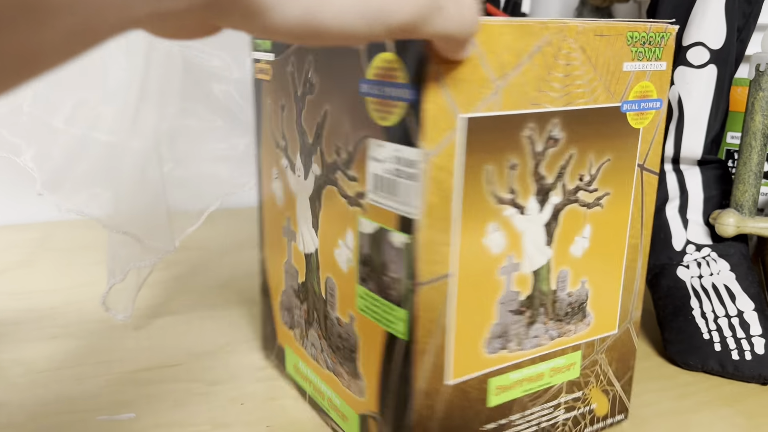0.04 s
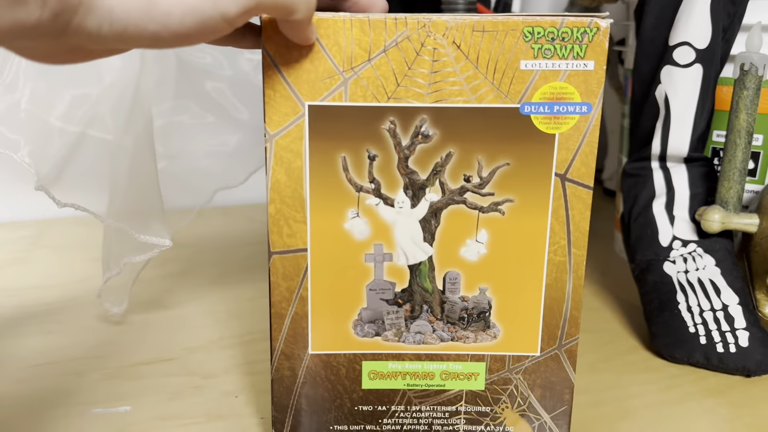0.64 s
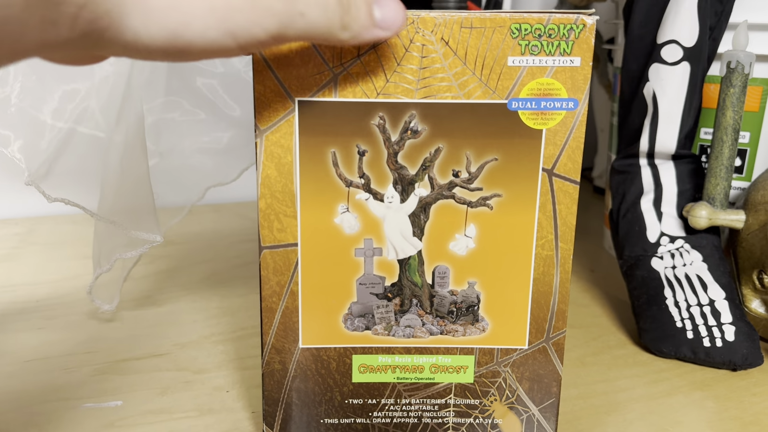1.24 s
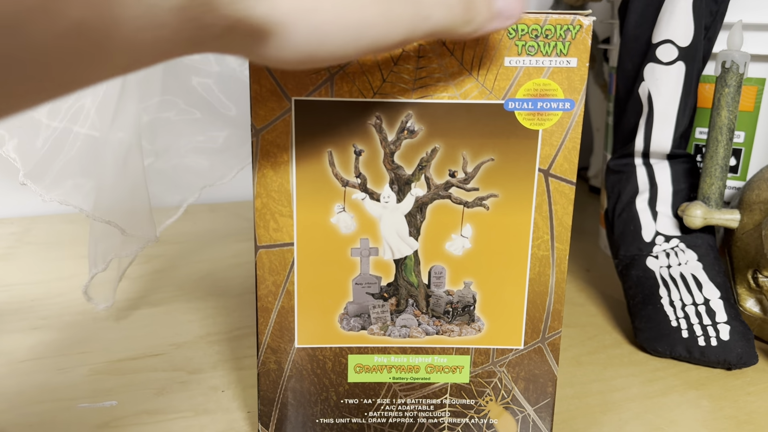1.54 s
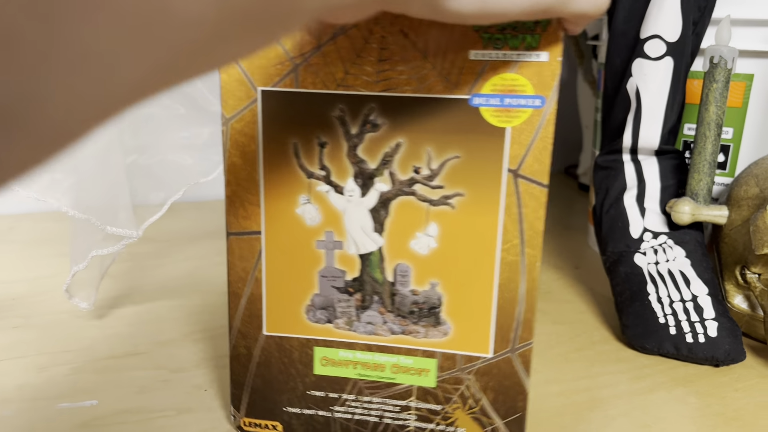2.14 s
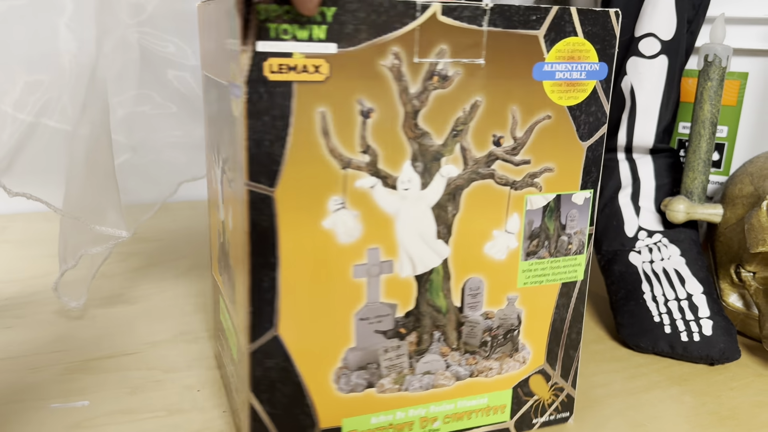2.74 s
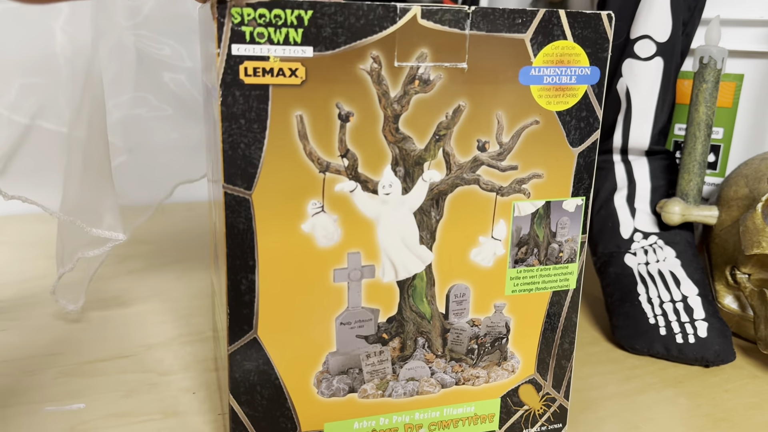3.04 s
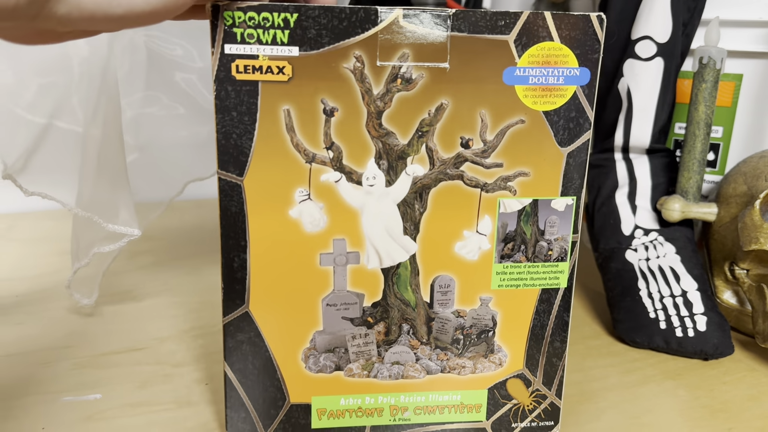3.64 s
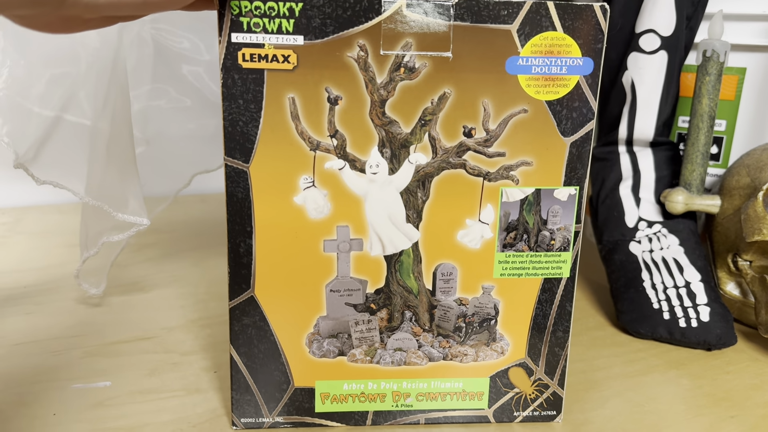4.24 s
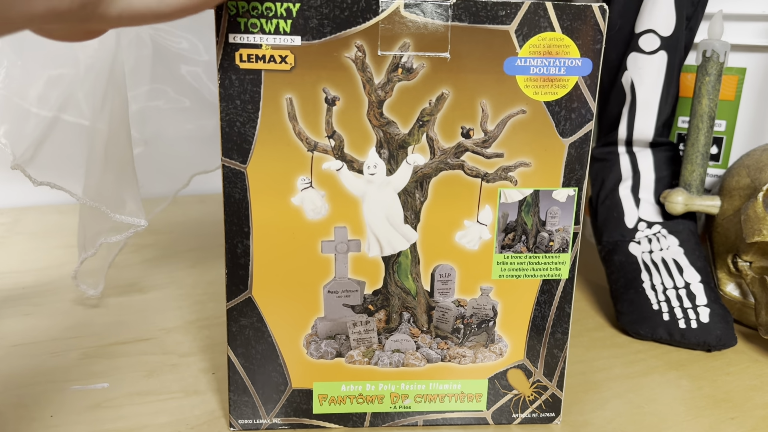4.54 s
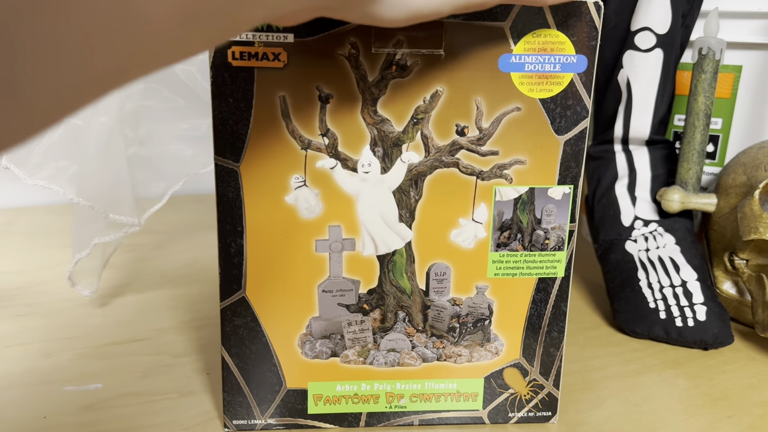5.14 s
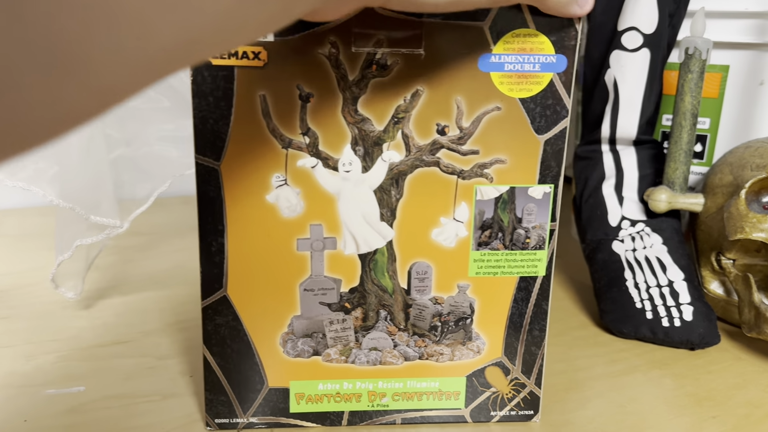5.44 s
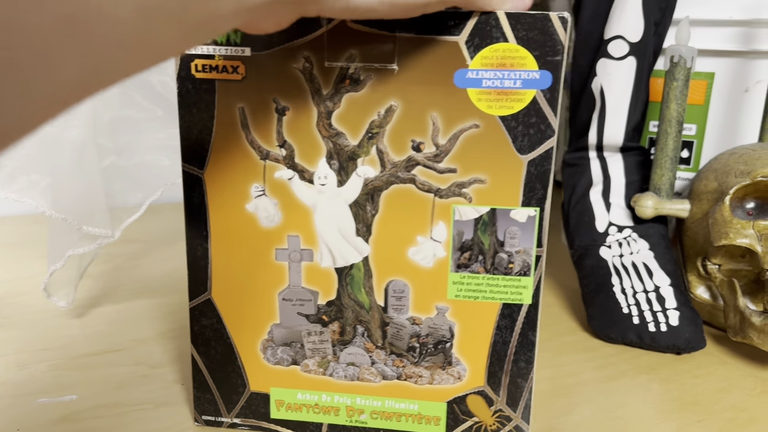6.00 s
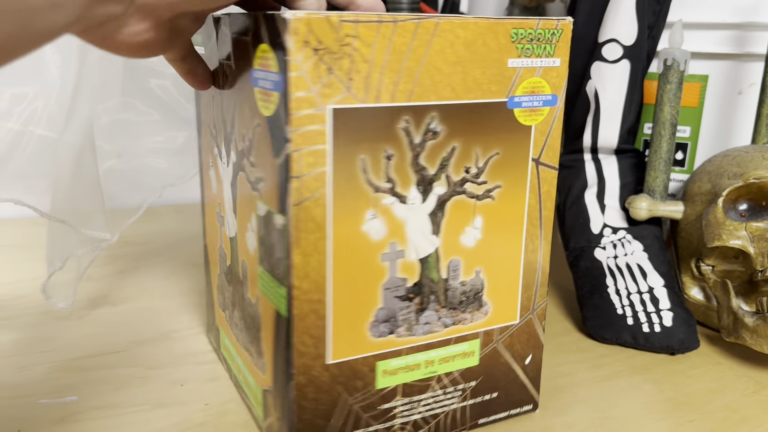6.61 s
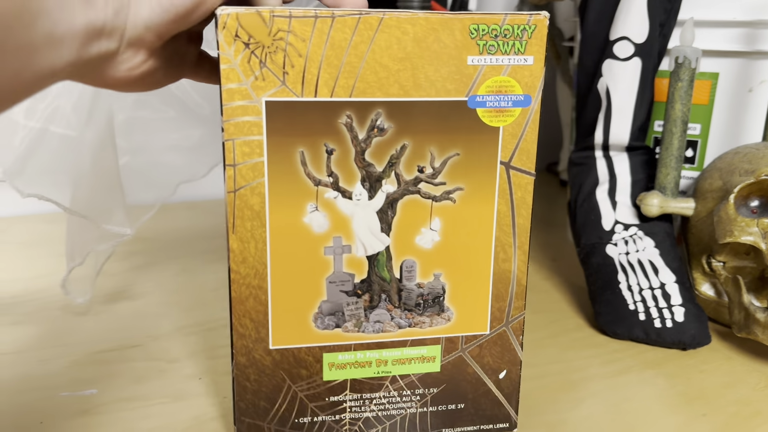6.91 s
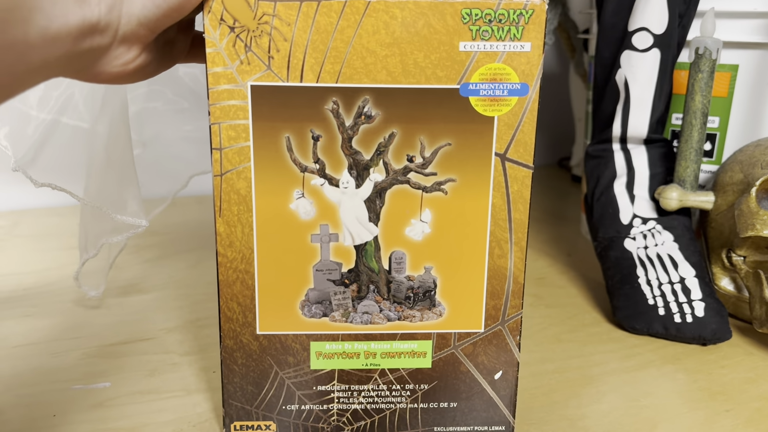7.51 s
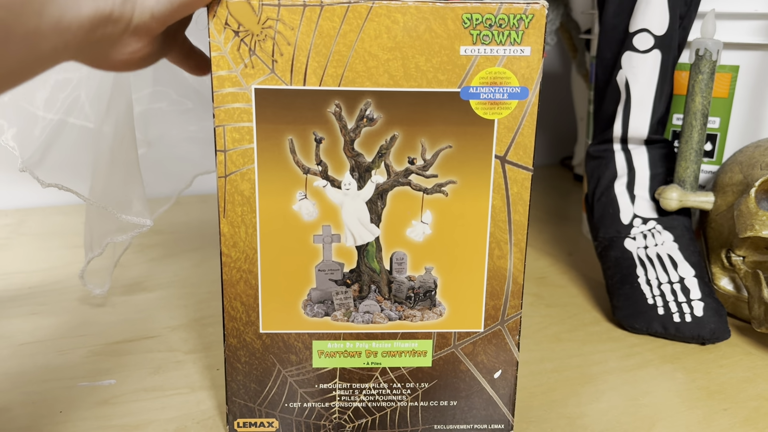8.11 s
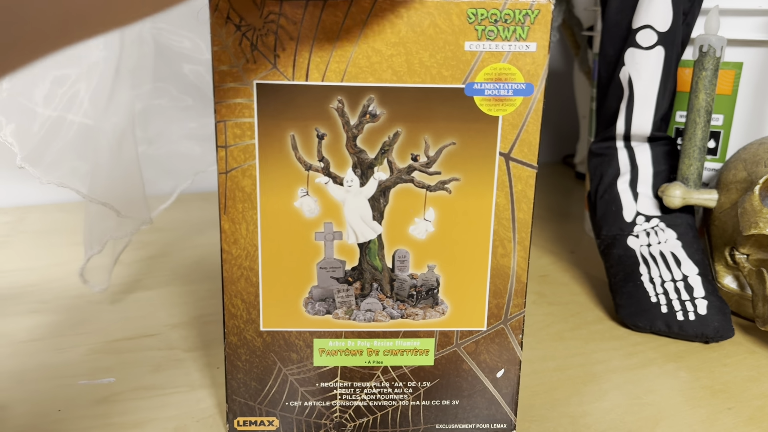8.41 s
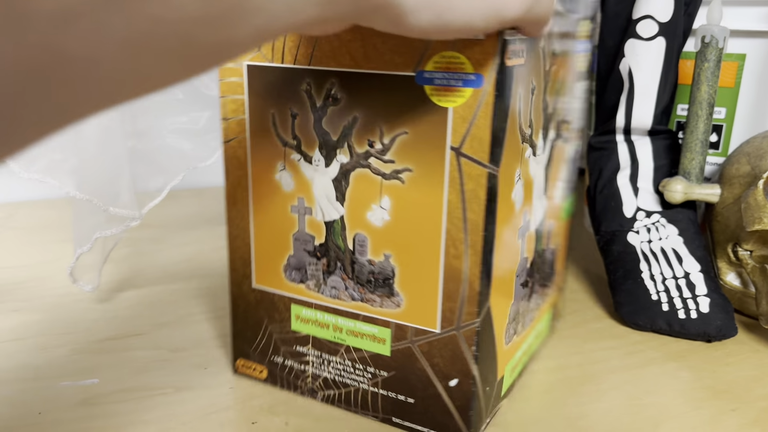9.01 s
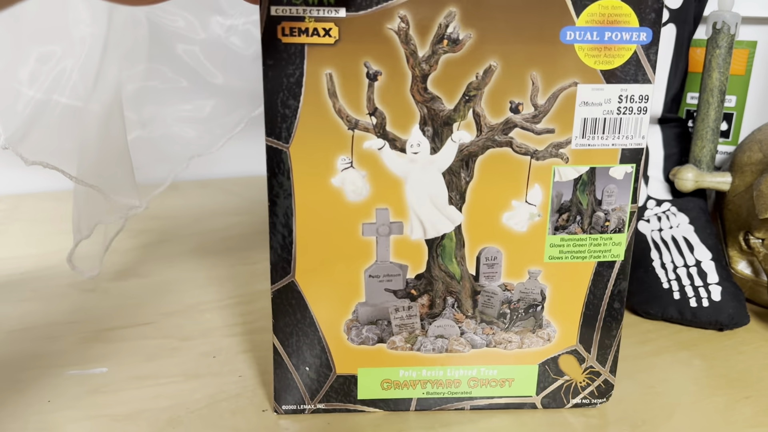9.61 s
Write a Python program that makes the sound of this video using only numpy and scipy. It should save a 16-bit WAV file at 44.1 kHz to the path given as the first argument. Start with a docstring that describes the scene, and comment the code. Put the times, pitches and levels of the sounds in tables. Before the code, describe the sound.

A cardboard box is turned by hand on a wooden table, heard close up. It opens with a dry, hollow scrape that fades by 0.6 seconds. Light finger knocks and ticks follow around 1.5 seconds. A second rasping slide runs from 2 to 2.9 seconds, with a softer, short one near 3.3. From about 3.5 to 5.8 seconds fingers rub, tap and grip the card again, and the box rocks with small low thuds. A firmer knock lands at 5.9 seconds and leads into another hissing scrape until about 7, with a sharp snap of the edge at 6.4, the loudest click. Brief rubs and light taps come around 7.2 and from 8 to 8.7 seconds. A last scrape lasts from 8.8 to 9.5, ending in a few ticks. Soft room air and a faint low hum continue underneath.

```python
"""Hollow, rasping scrapes of a cardboard box turned by hand on a wooden table, close up in a quiet room.
The bottom edge slides in countless tiny slips that rasp, hiss and make the panels drone.
Between turns the fingers rub, knock and re-grip, edges tick, and the box rocks on the table.
Soft room air and a low hum lie underneath."""
import sys
import numpy as np
from scipy import signal
from scipy.fft import rfft, irfft, next_fast_len
from scipy.io import wavfile

SR = 44100
rng = np.random.default_rng(int(sys.argv[2]) if len(sys.argv) > 2 else 0)


def waveform_to_disk(signal):
    """Save audio, clipped to [-1, 1], as 16-bit WAV at the path in sys.argv[1]."""
    frames = np.transpose(np.atleast_2d(signal))
    scaled = np.clip(frames, -1, 1) * 32767
    samples = np.round(scaled).astype(np.int16)
    wavfile.write(sys.argv[1], SR, samples)


N = 429975
TIME_S = np.arange(N) / SR

# Speed of each slide, as a curve of relative rasp level: time_s, speed_db, hiss_over_rasp_db
SLIDE_CURVES = [
    [(0.0, -51.5, -1), (0.074, -46.5, -2.5), (0.23, -55.5, -0.5), (0.24, -50, -2.5), (0.324, -60, 1),
     (0.356, -55.5, -4), (0.5, -68, -1.5), (0.566, -56.5, -5.5), (0.66, -100, -7)],
    [(2.0, -86, -11), (2.074, -50.5, -3.5), (2.256, -48, -3.5), (2.266, -48.5, 0), (2.52, -50.5, 1.5),
     (2.562, -57.5, 2), (2.732, -52, -1), (2.808, -55, -4), (2.89, -80.5, -7)],
    [(3.12, -84, -10), (3.138, -95, 4), (3.16, -67, -6.5), (3.292, -55, -0.5), (3.3, -53, -4),
     (3.37, -57.5, -0.5), (3.4, -60, -6), (3.452, -81.5, -17), (3.48, -86, 1)],
    [(5.97, -69, -6), (6.168, -45.5, 0.5), (6.26, -50.5, -4), (6.39, -49, -0.5), (6.4, -48, -1),
     (6.596, -53, -0.5), (6.89, -54.5, -3.5), (7.08, -64.5, -4.5), (7.16, -100, -16)],
    [(8.8, -79.5, -9), (8.84, -67.5, 0), (8.846, -57.5, -0.5), (8.912, -45.5, -2.5), (8.964, -46, -1),
     (9.484, -48.5, -6.5), (9.53, -62.5, -2), (9.56, -69, -11)],
]
# Grip on the two panels, per slide: lower_hz, upper_hz, mid_upper_db, end_upper_db, drone_weight_db
SLIDE_GRIPS = [(350, 508, -5.5, -8, 2), (348, 500, 2, -9, 1.5), (309, 490, -12.5, -7, 4.5),
               (298, 530, 5.5, 1.5, 1.5), (334, 520, 4, -1, 1)]
# Short rubs of fingers and box, relative levels: start_s, length_s, rasp_db, drone_db, hiss_db
FINGER_RUBS = [(1.591, 0.16, -75, -71.5, -84), (1.756, 0.086, -63.5, -56, -75),
               (2.884, 0.035, -63, -61.5, -72), (3.015, 0.038, -70, -64.5, -80),
               (3.481, 0.16, -65.5, -52.5, -75.5), (3.946, 0.1, -72.5, -56.5, -84),
               (4.05, 0.14, -82, -65.5, -94), (4.174, 0.12, -74.5, -59.5, -93),
               (4.916, 0.08, -76.5, -70, -82), (4.97, 0.079, -74, -64, -72), (5.195, .065, -60, -51.5, -64),
               (5.276, 0.027, -46.5, -41, -50), (5.323, 0.033, -65, -53, -76),
               (5.386, 0.062, -62, -54.5, -72), (5.455, 0.092, -68.5, -62, -80),
               (5.539, 0.058, -59, -52, -61.5), (5.615, 0.11, -48.5, -46.5, -48.5),
               (5.708, 0.12, -61, -55, -61), (5.802, 0.072, -53.5, -50.5, -57.5),
               (6.996, 0.17, -70.5, -53, -83), (7.177, 0.069, -54, -47.5, -57.5),
               (7.231, 0.07, -63.5, -49.5, -68), (8.061, 0.06, -66.5, -61, -72),
               (8.132, 0.051, -65.5, -61, -75), (8.246, 0.059, -73, -59, -84),
               (8.327, 0.055, -73, -62, -80), (8.636, 0.055, -65, -57, -82), (9.528, 0.076, -58, -49, -65)]
# Finger knocks: start_s, thud_db, thud_hz, slap_db, sway_db
FINGER_KNOCKS = [(0.265, -50, 160, -60, -42), (1.232, -61, 139, -55, -47.5), (1.354, -39.5, 244, -48, -47),
                 (1.514, -39.5, 150, -41.5, -37.5), (1.626, -60.5, 140, -69, -39),
                 (1.852, -50, 160, -65, -41.5), (4.438, -42.5, 226, -46, -49),
                 (4.73, -37.5, 280, -45.5, -41), (4.993, -47, 318, -44.5, -44), (5.076, -48, 243, -42, -58),
                 (5.277, -42.5, 193, -60, -47), (5.611, -51, 180, -67, -36.5),
                 (5.898, -24.5, 203, -36, -30), (5.925, -33.5, 200, -31.5, -59),
                 (6.805, -35, 173, -43, -45), (8.1, -46, 242, -41.5, -48), (8.263, -43, 220, -53.5, -54),
                 (8.4, -45.5, 188, -49, -46), (8.662, -52, 285, -46, -39), (8.773, -71, 143, -60, -47.5),
                 (9.738, -54, 318, -53.5, -56)]
# Ticks of nails and card edges: start_s, level_db, snap_s
EDGE_TICKS = [(0.5043, -42.5, .0004), (0.6938, -66, .0012), (1.5096, -48, .0007), (1.7964, -41, 0.00054),
              (3.144, -48.5, .0004), (3.835, -61, 0.0004), (4.0937, -55, 0.00028), (4.436, -47.5, 0.00057),
              (4.636, -63, .0005), (5.0755, -33.5, 0.0034), (5.646, -37, 0.00088), (5.6708, -28, 0.0039),
              (5.8696, -40, .0005), (5.899, -36.5, 0.00052), (5.933, -38, .0008), (6.3974, -33, 0.0012),
              (6.4095, -19, 0.00062), (6.4126, -23, 0.0011), (6.77, -31, 0.00037), (6.8842, -33, 0.0005),
              (7.1825, -42.5, 0.0007), (7.216, -38, .0006), (7.3438, -48.5, .0006), (8.173, -49, .001),
              (8.3871, -35.5, 0.00068), (8.651, -60, .002), (8.743, -60, .0004), (8.8486, -31, 0.00038),
              (9.577, -41, 0.00068), (9.5978, -34, 0.0013), (9.734, -49.5, 0.00055)]
# Box modes: pitch_hz, level_db, t60_s
BOX_MODES = [(180, -13, 0.11), (301.5, 1, 0.11), (385, -32, .07), (506, 2.5, 0.07), (736, -10.5, 0.089),
             (856, -7.5, 0.034)]

# Source spectra: freq_hz, gain_db
DRONE_SPECTRUM = [(30, -49), (70, -6), (125, -6), (190, 1), (280, 1), (360, -13), (430, 0), (560, -12.5),
                  (640, -18), (900, -23), (2000, -93.5)]
RASP_SPECTRUM = [(300, -38.5), (620, -1), (730, 3), (1100, 1), (1600, -3.5), (2200, -1.5), (2900, -5.5),
                 (3800, -6.5), (5500, -15), (12000, -63.5)]
HISS_SPECTRUM = [(1500, -35.5), (3200, 3.5), (4300, -0.5), (5600, 2), (7000, 4.5), (8200, 5.5), (9500, 2),
                 (10700, -3), (12500, 4), (15500, 1.5)]
FIZZ_SPECTRUM = [(8500, -31), (10500, -10), (12500, 2), (15500, -5)]
SLAP_SPECTRUM = [(80, 4.5), (300, 2), (600, -6), (1200, -10), (2200, -17.5), (4500, -27), (12000, -55)]
TICK_SPECTRUM = [(100, -39), (300, 12), (900, -13.5), (2300, 2.5), (4500, -3), (7300, 1), (10500, -7),
                 (13000, -3.5), (16000, -3)]
AIR_SPECTRUM = [(20, -16.5), (45, -1.5), (90, -3), (115, -7), (170, -13), (300, -17.5), (600, -27.5),
                (1000, -32), (2000, -37), (4000, -42.5), (8000, -42), (10500, -48), (13000, -45),
                (16000, -48)]

# Contour of the low hum: time_s, relative_db
HUM_CONTOUR = [(0.0, -60.5), (0.32, -58.5), (0.62, -68), (4.8, -69.5), (5.51, -67), (7.33, -66),
               (7.68, -75.5), (9.75, -66)]
# Room decay: freq_hz, t60_s
ROOM_DECAY = [(100, 0.22), (400, 0.38), (1000, 0.22), (3000, 0.24), (7000, 0.13), (15000, .1)]
# Likeness of left and right: freq_hz, coherence_ratio
STEREO_COHERENCE = [(100, 0.89), (500, 0.97), (1000, 0.73), (1300, 0.4), (2100, 0.82), (3700, 0.7),
                    (5600, 0.5), (7000, 0.9), (8000, 0.9), (8500, 1), (9100, 0.97), (10000, 0.82),
                    (15000, 0.8)]
# Phase between the sides: freq_hz, left_lead_rad
STEREO_PHASE = [(100, 0), (600, .3), (1100, .2), (1600, -.6), (2300, .4), (3100, 1.5), (4200, .8),
                (6200, .3), (7300, 1.8), (8100, 3.1), (9000, 3.1), (12000, 1.9), (16000, .6)]
# Balance of the sides: freq_hz, left_over_right_db
STEREO_BALANCE = [(300, 0.3), (750, 4), (1200, 3.5), (2200, -1), (3500, 3.5), (5500, -0.5), (7500, 2),
                  (9500, 0)]


def scraping(judder, fizz_db=-14.5, fizz_knee_db=-40):
    """Edge slips: heard directly as rasp, hiss and fizz, and through the panels as a hollow drone."""
    slide_gains = sliding()
    rasp_gain, drone_gain, hiss_gain = np.hypot(slide_gains, rubbing())
    slide_hiss = slide_gains[2]
    fizz_gain = slide_hiss * np.minimum(slide_hiss / gain_of(fizz_knee_db), 1)  # grows on fast slides
    coarse = slips(per_s=7000, spread_db=2) * judder
    fine = slips(per_s=14000, spread_db=5) * judder
    grit = slips(per_s=34, spread_db=5)
    drone = evened(evened(colour(coarse, DRONE_SPECTRUM)) + gain_of(2.5) * judder * panels())
    rasp = evened(colour(coarse, RASP_SPECTRUM))
    hiss = evened(colour(fine + 0.52 * coarse + 0.25 * grit, HISS_SPECTRUM))
    fizz = evened(colour(fine + 0.44 * grit, FIZZ_SPECTRUM))
    return (gain_of(-0.45) * drone_gain * drone + gain_of(0.7) * rasp_gain * rasp
            + gain_of(2) * hiss_gain * hiss + gain_of(fizz_db) * fizz_gain * fizz)


def slips(per_s, spread_db):
    """Card fibres catch: random clicks of uneven size."""
    size = gain_of(spread_db * np.minimum(rng.exponential(1, N), 4))
    return evened(size * rng.choice([-1, 1], N) * (rng.random(N) < per_s / SR))


def sliding(push_over_rasp_db=9.5, push_knee_db=-47.5):
    """Rasp, drone and hiss gains follow the speed of the box; the drone levels off."""
    gains = np.zeros((3, N))
    for curve, (*_, weight_db) in zip(SLIDE_CURVES, SLIDE_GRIPS):
        time_s, speed_db, hiss_over_rasp_db = np.transpose(curve)
        moving = (TIME_S >= time_s[0]) & (TIME_S <= time_s[-1])
        rasp = gain_of(np.interp(TIME_S, time_s, speed_db)) * moving
        push = rasp * gain_of(push_over_rasp_db)
        drone = gain_of(weight_db) * push / np.hypot(1, push / gain_of(push_knee_db))
        hiss = rasp * gain_of(np.interp(TIME_S, time_s, hiss_over_rasp_db))
        gains += [rasp, drone, hiss]
    return gains


def rubbing(attack_s=0.039, sag_db=-2, release_s=0.017):
    """Rasp, drone and hiss gains of short rubs: each takes hold, eases off and lets go."""
    gains, t = np.zeros((3, N)), TIME_S[:SR // 2]
    for start_s, length_s, *levels_db in FINGER_RUBS:
        held = np.minimum(t / attack_s, 1) ** 2 * gain_of(sag_db * np.minimum(t / length_s, 1))
        envelope = held * np.exp(-np.maximum(t - length_s, 0) / release_s)
        for gain, level_db in zip(gains, levels_db):
            add(gain, start_s, gain_of(level_db) * envelope)
    return gains


def panels():
    """Two sides of the box resonate, each shaken by slips along its own part of the edge."""
    lower_hz, upper_hz, upper_db = grip_tuning()
    lower = resonate(slips(per_s=3000, spread_db=-1.5), lower_hz, stage_width_hz=102)
    upper = resonate(slips(per_s=3000, spread_db=-1.5), upper_hz, stage_width_hz=100)
    upper_share = 1 / (1 + gain_of(-upper_db) ** 2)  # the grip damps one panel and frees the other
    return np.sqrt(1 - upper_share) * lower + np.sqrt(upper_share) * upper


def grip_tuning(start_upper_db=-5):
    """The grip tunes both panels; the level of upper over lower shifts as the box turns."""
    times_s, tuning = [], []
    for curve, (lower_hz, upper_hz, mid_db, end_db, _) in zip(SLIDE_CURVES, SLIDE_GRIPS):
        start_s, end_s = curve[0][0], curve[-1][0]
        times_s += [start_s, (start_s + end_s) / 2, end_s]
        tuning += [(lower_hz, upper_hz, db) for db in (start_upper_db, mid_db, end_db)]
    return [np.interp(TIME_S, times_s, column) for column in np.transpose(tuning)]


def knocks(swell_s=0.0018, slap_s=0.00301, lag_s=0.00299):
    """A soft fingertip slaps the card, then pushes the panel into a few damped swings."""
    out, t = np.zeros(N), TIME_S[:SR // 4]
    for start_s, thud_db, thud_hz, slap_db, _ in FINGER_KNOCKS:
        swing = (t / swell_s / 2) ** 2 * np.exp(2 - t / swell_s) * np.sin(2 * np.pi * thud_hz * t)
        ring = box_ring(t) * (1 - np.exp(-t / swell_s))
        slap = colour(rng.standard_normal(len(t)) * t * np.exp(-t / slap_s), SLAP_SPECTRUM)
        add(out, start_s + lag_s, gain_of(thud_db) * (swing + gain_of(-12) * ring))
        add(out, start_s - slap_s / 2, gain_of(slap_db) * slap / abs(slap).max())
    return out


def box_ring(t, detune_ratio=0.053):
    """Decaying modes of the box, struck at a random spot."""
    ring = np.zeros(len(t))
    for pitch_hz, level_db, t60_s in BOX_MODES:
        struck_hz = pitch_hz * (1 + detune_ratio * rng.standard_normal())
        envelope = gain_of(level_db - 60 * t / t60_s)
        ring += envelope * np.sin(2 * np.pi * struck_hz * t) * rng.choice([-1, 1])
    return ring


def ticks(crumble_db=-12, crumble_t60_s=0.01):
    """A nail or card edge snaps, with a short crumble behind it."""
    out, t = np.zeros(N), TIME_S[:SR // 8]
    for start_s, level_db, snap_s in EDGE_TICKS:
        envelope = np.exp(-t / snap_s) + gain_of(crumble_db - 60 * t / crumble_t60_s)
        snap = colour(rng.standard_normal(len(t)) * envelope, TICK_SPECTRUM)
        add(out, start_s, gain_of(level_db) * snap / abs(snap).max())
    return out


def rocking(sway_hz=59.3, press_lift_hz=34.8, settle_s=0.012, lag_s=0.0143, rise_s=0.0086, t60_s=0.15):
    """The knocked box sways, faster while the finger presses, and booms through the table."""
    out, t = np.zeros(N), TIME_S[:SR // 2]
    cycles = np.cumsum(sway_hz + press_lift_hz * np.exp(-t / settle_s)) / SR
    sway = gain_of(-60 * t / t60_s) * (1 - np.exp(-t / rise_s)) * np.sin(2 * np.pi * cycles)
    for start_s, *_, sway_db in FINGER_KNOCKS:
        add(out, start_s + lag_s, gain_of(sway_db) * sway)
    return out


def reflections(early_s=0.0074, early_db=6, frame_samples=256):
    """Impulse response: quick echoes off the table and things on it, then the short room tail."""
    hz, t, noise = signal.stft(rng.standard_normal(SR // 2), SR, nperseg=frame_samples)
    decay = gain_of(-60 * t / at_hz(ROOM_DECAY, hz)[:, None])
    decay *= 1 + gain_of(early_db) * np.exp(-t / early_s)
    decay /= np.linalg.norm(decay, axis=1, keepdims=True)
    _, tail = signal.istft(noise * decay, SR, nperseg=frame_samples)
    return np.pad(tail / np.linalg.norm(tail), (frame_samples // 4, 0))


def hum(pitch_hz=57.8, waver_ratio=0.4, lift_db=3):
    """A low tone, made to waver by narrow-band noise."""
    time_s, relative_db = np.transpose(HUM_CONTOUR)
    flutter = resonate(rng.standard_normal(N), pitch_hz, stage_width_hz=45)
    tone = evened(np.sin(2 * np.pi * pitch_hz * TIME_S) + waver_ratio * flutter)
    return gain_of(np.interp(TIME_S, time_s, relative_db) + lift_db) * tone


def room_air(level_db=-68.5):
    """Soft wash of still air."""
    return gain_of(level_db) * evened(colour(rng.standard_normal(N), AIR_SPECTRUM))


def gain_of(db):
    """Decibels to amplitude."""
    return 10 ** (np.asarray(db) / 20)


def evened(x):
    """Scales to unit rms."""
    return x / np.sqrt(np.mean(x ** 2) + 1e-20)


def at_hz(table, hz):
    """Interpolates a table over log frequency."""
    freq_hz, value = np.transpose(table)
    return np.interp(np.log(hz + 1), np.log(freq_hz + 1), value)


def add(mix, start_s, sound):
    """Mixes a sound in at start_s."""
    part = mix[max(round(start_s * SR), 0):][:len(sound)]
    part += sound[:len(part)]


def colour(x, spectrum, fft_size=4096):
    """Minimum-phase filter; attacks stay sharp."""
    hz = abs(np.fft.fftfreq(fft_size, 1 / SR))
    log_gain = np.log(gain_of(at_hz(spectrum, hz)))
    response = np.exp(np.conj(signal.hilbert(log_gain)))
    taps = np.fft.ifft(response).real[:fft_size // 2]
    return signal.fftconvolve(x, taps)[:len(x)]


def resonate(x, pitch_hz, stage_width_hz):
    """Two resonators in series that follow pitch_hz; unit rms out."""
    carrier = np.exp(2j * np.pi * np.cumsum(pitch_hz * np.ones(len(x))) / SR)
    pole = np.exp(-np.pi * stage_width_hz / SR)
    for _ in range(2):
        x = 2 * (carrier * signal.lfilter([1 - pole], [1, -pole], x / carrier)).real
    return evened(x)


def wander(corner_hz):
    """Smooth random curve of unit rms."""
    rolloff = 1 + (np.fft.rfftfreq(N, 1 / SR) / corner_hz) ** 2
    return evened(irfft(rfft(rng.standard_normal(N)) / rolloff, N))


def scene():
    """Stereo mix: the long edge reaches the sides partly alike; blows come from one spot, with echoes."""
    fft_size = next_fast_len(N + SR)
    hz = np.fft.rfftfreq(fft_size, 1 / SR)
    judder = gain_of(0.69 * wander(corner_hz=59))  # the edge grips and lets go unevenly
    common, apart = (rfft(scraping(judder) + room_air(), fft_size) for _ in range(2))
    blows = rfft(knocks() + ticks(), fft_size)
    echo_send = gain_of(3) * blows + gain_of(-3) * common
    coherence = np.clip(at_hz(STEREO_COHERENCE, hz), 0, 1)
    channels = []
    for side in (0.5, -0.5):  # left, right
        direct = blows + np.sqrt((1 + coherence) / 2) * common
        direct += side * np.sqrt(2 * (1 - coherence)) * apart
        echoes = np.sqrt(1 - coherence) * echo_send * rfft(reflections(), fft_size)
        lead = np.exp(1j * side * at_hz(STEREO_PHASE, hz))
        balance = gain_of(side * at_hz(STEREO_BALANCE, hz))
        channels.append(irfft((direct * lead + echoes) * balance, fft_size)[:N])
    return np.array(channels) + rocking() + hum()  # deep bass reaches both sides alike


def record(dry, low_cut_hz=32, high_cut_hz=16000):
    """Rumble filter and steep band limit."""
    taps = signal.firwin(511, high_cut_hz, window=("kaiser", 9), fs=SR)
    trimmed = signal.sosfilt(signal.butter(2, low_cut_hz, "high", fs=SR, output="sos"), dry)
    return signal.oaconvolve(trimmed, taps[None], "same", axes=1)


dry = scene()
out = record(dry)
waveform_to_disk(out)
```